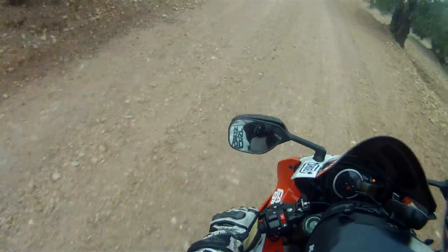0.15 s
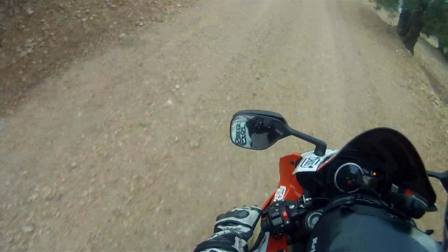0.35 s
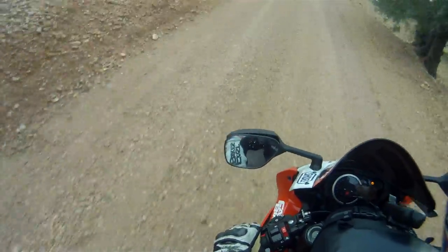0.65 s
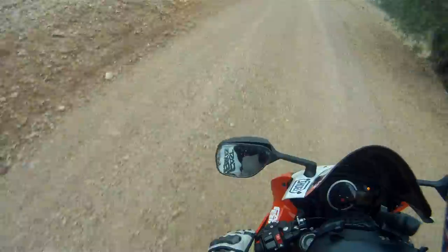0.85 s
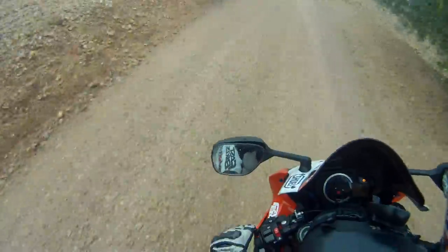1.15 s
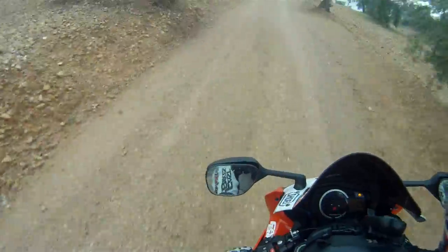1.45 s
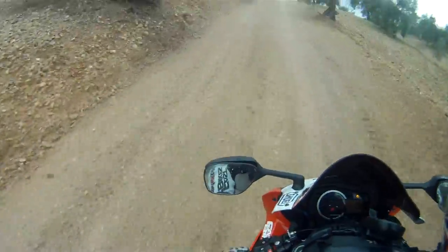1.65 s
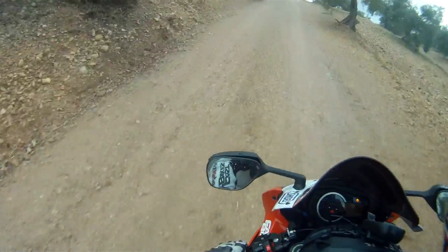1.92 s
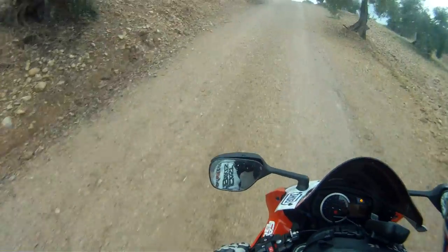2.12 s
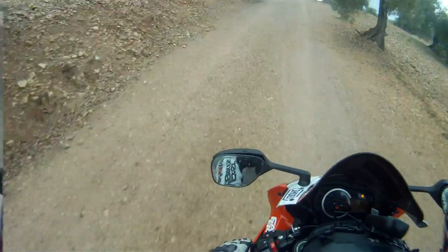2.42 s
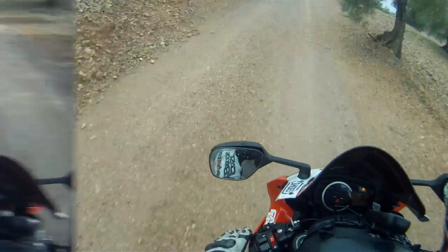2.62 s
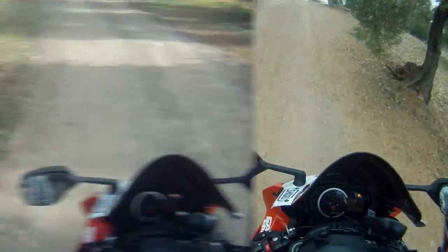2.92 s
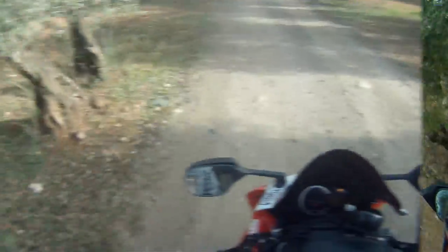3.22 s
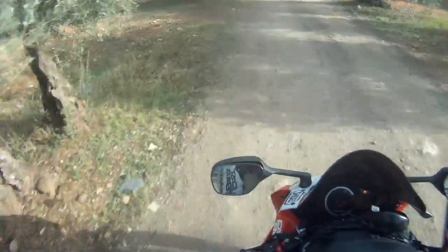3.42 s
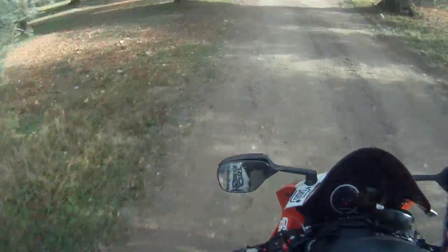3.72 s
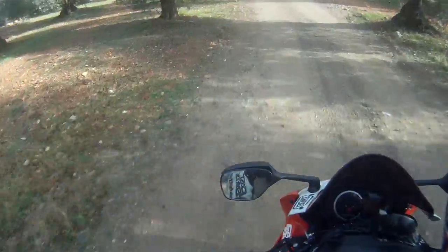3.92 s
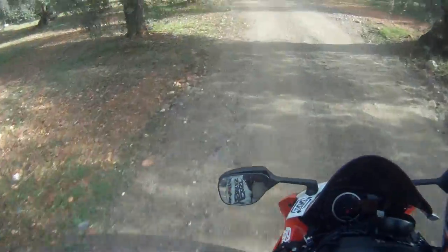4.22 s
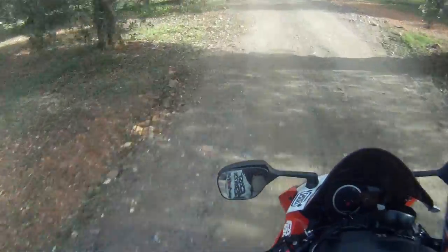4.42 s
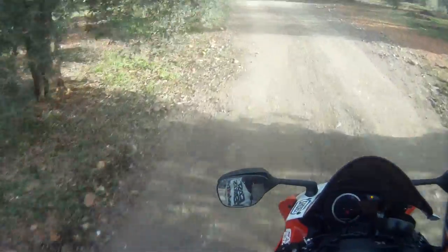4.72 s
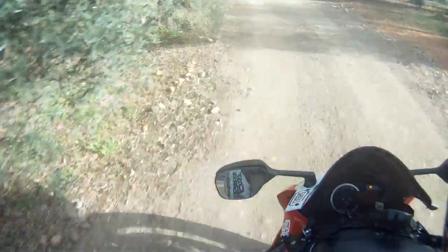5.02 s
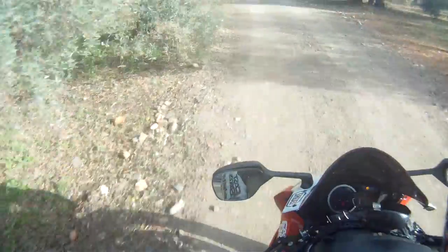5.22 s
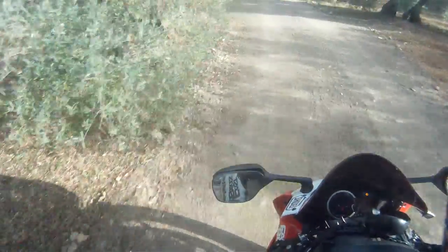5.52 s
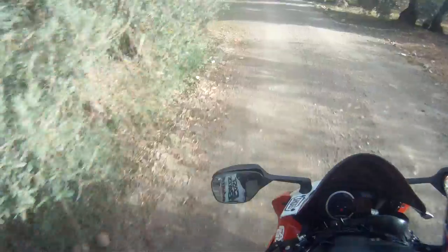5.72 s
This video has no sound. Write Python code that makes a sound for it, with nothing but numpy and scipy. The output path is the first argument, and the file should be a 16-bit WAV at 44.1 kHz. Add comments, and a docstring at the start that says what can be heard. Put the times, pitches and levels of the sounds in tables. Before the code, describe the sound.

Close on a rider's helmet, a motorcycle engine drones gently over rumbling tyres and gritty gravel, first whining, then slower and plainer.

```python
"""A low, steady engine hum with a gear whine over it: a four-cylinder motorcycle potters along a gravel track.
The microphone rides on the helmet; tyres rumble, gravel crunches and a few stones shift under the tyre.
One stretch, under light throttle, fades into a slower one without the whine. Sines make the low engine orders
and the gears, kicked resonances the exhaust, and shaped noise the gravel.
The small camera samples at a low rate and holds each sample, which mirrors the sound into the treble."""
import sys
import numpy as np
from scipy import signal
from scipy.fft import rfft, irfft
from scipy.io import wavfile

SR = 44100
rng = np.random.default_rng(int(sys.argv[2]) if len(sys.argv) > 2 else 0)


def transcribe(u):
    """Save the signal u as a 16-bit wav file named by the first command-line argument.

    u: samples, shape (n,) or (channels, n), limited to [-1, 1]; the rate is SR.
    q: integer samples, one column per channel.
    """
    v = np.clip(np.atleast_2d(u).T, -1, 1)
    q = np.round(v * 32767).astype(np.int16)
    wavfile.write(sys.argv[1], SR, q)


N = 258426
TIME = np.arange(N) / SR   # seconds

# Spectrum of stones and engine clatter on the first stretch. Each row: frequency in Hz, relative density in dB.
CRUNCH_SPECTRUM = [(470, -34), (800, -9.5), (947, -4.5), (1030, -8.5), (1240, -6), (1380, -10.5),
                   (1480, -5.5), (1720, -8.5), (2280, -4), (3500, -14), (3900, -17), (5030, -26),
                   (6000, -31.5), (7800, -79), (13200, -120)]
# Engine speed on the first stretch, under load. Each row: time in seconds, firings per second.
PULLING_FIRINGS = [(0, 60.2), (.45, 61.3), (.53, 60.7), (.78, 62.1), (1.08, 62.2), (1.38, 63.9),
                   (1.5, 63.6), (2.33, 66.0), (2.54, 65.2), (2.83, 65.6), (2.96, 63.9), (3.2, 63.2)]


def from_db(db):
    """dB to gain."""
    return 10 ** (np.asarray(db) / 20)


def rms_one(x):
    """Scale to rms 1."""
    return x / np.sqrt(np.mean(x ** 2) + 1e-20)


def in_time(rows):
    """Draw straight lines between the rows of a table: each column at every sample."""
    seconds, *columns = np.transpose(rows)
    return [np.interp(TIME, seconds, column) for column in columns]


def drift(pole_hz):
    """Slow chance: noise through a double one-pole low-pass, made at 1/40 of the sample rate; spread 1."""
    step = 40
    r = np.exp(-2 * np.pi * pole_hz * step / SR)
    noise = rng.standard_normal(N // step + 2002)
    slow = signal.lfilter([1], [1, -2 * r, r * r], noise)[2000:]   # skip the filter's start
    return np.interp(np.arange(N) / step, np.arange(len(slow)), rms_one(slow))


def resonance(x, hz, width_hz):
    """A two-pole resonance with gain 1 at its peak, as of a ringing panel or pipe."""
    r = np.exp(-np.pi * width_hz / SR)
    feedback = [1, -2 * r * np.cos(2 * np.pi * hz / SR), r * r]
    return signal.lfilter([(1 - r * r) / 2, 0, (r * r - 1) / 2], feedback, x)


def coloured(x, spectrum):
    """Filter x by the curve of the table, straight in dB over log frequency; rms 1."""
    hz, db = np.transpose(spectrum)
    bins_hz = np.maximum(np.fft.rfftfreq(N, 1 / SR), 1)
    curve_db = np.interp(np.log(bins_hz), np.log(hz), db, left=-90, right=-90)
    return rms_one(irfft(rfft(x) * from_db(curve_db), N))


def gravel(clatter, later):
    """Lumpy rumble, and a crunch of dense grains that throbs with the firings and rings the panels."""
    # Coarseness of the track. Each row: time in seconds, crunch level in dB.
    track = [(0.0, -38.5), (0.37, -39.5), (0.47, -37.5), (1.76, -39), (1.84, -37), (1.89, -40.5),
             (2.32, -37.5), (3.04, -43.5), (3.38, -41.5), (3.86, -43), (4.91, -39), (5.22, -41),
             (5.41, -38), (5.54, -41.5), (5.8, -41.5)]
    # Tyres and frame on the first stretch. Each row: frequency in Hz, relative density in dB.
    rumble_spectrum = [(15, -37), (25, -23), (53, -2), (130, -4), (150, -7), (173, -7), (315, -7.5),
                       (352, -11.5), (612, -16), (801, -29), (1100, -55), (1430, -76), (2420, -120)]
    # Tyres and frame on the slower stretch. Each row: frequency in Hz, relative density in dB.
    later_rumble_spectrum = [(15, -41), (25, -18), (44, -4.5), (114, -2), (136, -4.5), (162, 0), (209, -7),
                             (282, -6), (381, -10), (814, -26), (1100, -44.5), (1430, -75), (2420, -120)]
    # Stones and clatter on the slower stretch. Each row: frequency in Hz, relative density in dB.
    later_crunch_spectrum = [(470, -37.5), (800, -10), (939, -4), (1340, -3), (1520, -7), (1810, -2.5),
                             (2430, -3.5), (3470, -13.5), (3970, -16), (5070, -24.5), (6000, -29.5),
                             (7800, -70.5), (13200, -120)]
    # Panels that ring in the crunch. Each row: frequency in Hz, width in Hz, gain in dB over the plain grains.
    panels = [(2240, 39, -20.5), (3910, 150, -2.5), (4930, 89, -0.5)]
    mean_rumble_db, rumble_follows = -23.5, 0.24   # the second is its share of the crunch's swing

    crunch_db, = in_time(track)
    rumble_db = mean_rumble_db + rumble_follows * (crunch_db - crunch_db.mean())

    lumps = rng.standard_normal(N) * from_db(1.0 * drift(22))
    rumble = (1 - later) * coloured(lumps, rumble_spectrum) + later * coloured(lumps, later_rumble_spectrum)

    grains = rng.standard_normal(N) * from_db(0.58 * drift(11) + 1.0 * drift(140)) * clatter
    ringing = sum(from_db(db) * resonance(grains, hz, width_hz) for hz, width_hz, db in panels)
    grains = grains + ringing
    crunch = (1 - later) * coloured(grains, CRUNCH_SPECTRUM) + later * coloured(grains, later_crunch_spectrum)
    return from_db(rumble_db) * rumble + from_db(crunch_db) * crunch


def stones():
    """Bursts of crunch as a stone shifts under the tyre and jolts the frame: quick swell, short tail."""
    # Louder crunches. Each row: start in seconds, strength in dB ahead of the swell's smoothing.
    shifting_stones = [(0.137, -31), (0.7184, -30), (1.29, -30), (1.8376, -25.5), (2.3006, -34),
                       (2.364, -33), (4.829, -30), (4.885, -31.5), (5.0316, -31), (5.1144, -36)]
    rise_s, fall_s = 0.0035, 0.0045
    thud_db, thud_hz = 3.5, 450   # level beside the unfiltered crunch, and pitch of the frame

    burst = np.zeros(N)
    for start_s, db in shifting_stones:
        burst[round(start_s * SR)] = from_db(db)
    rise, fall = np.exp(-1 / (rise_s * SR)), np.exp(-1 / (fall_s * SR))
    tail = signal.lfilter([1], [1, -fall], burst)
    swell = signal.lfilter([1 - rise], [1, -rise], tail)

    crunch = coloured(rng.standard_normal(N), CRUNCH_SPECTRUM)
    dull = signal.sosfilt(signal.butter(2, 3200, fs=SR, output="sos"), crunch)
    thud = from_db(thud_db) * rms_one(resonance(rng.standard_normal(N), thud_hz, 180))
    return swell * (dull + thud)


def whine(hz, db, throb_db, waver):
    """Meshing teeth: a tone whose pitch wavers and whose level throbs."""
    throb_hz = 9.15   # the chain tightens and slackens
    throb = throb_db * np.cos(2 * np.pi * throb_hz * (TIME - .03))
    level = from_db(db + throb + 0.43 * drift(7.3))
    cycles = np.cumsum(hz * (1 + waver * drift(24.4))) / SR
    return np.sqrt(2) * level * np.sin(2 * np.pi * cycles)


def gears():
    """The whine follows engine speed; two steadier tones lie above it; all stop amid the fade."""
    # Whine, loud in spells. Each row: time in seconds, level in dB, throb depth in dB.
    whine_levels = [(0, -34, 4), (.45, -43, 8.5), (.92, -41, 11.5), (1.5, -45, 4.5), (2.0, -49, 5),
                    (2.2, -39, 3), (2.35, -46, 0), (2.47, -34, 0), (2.62, -41, 2), (2.8, -34, 4),
                    (3.0, -55, 3)]
    # Top tone of the gears. Each row: time in seconds, pitch in Hz, level in dB.
    top_tone = [(0, 1232, -50.5), (.5, 1210, -51), (1.1, 1240, -49.5), (1.9, 1285, -48), (2.4, 1293, -53),
                (2.8, 1292, -54), (3.05, 1255, -55)]
    whine_order, middle_share = 9.89, .75   # whine over firing rate; middle tone over top tone, in pitch
    middle_db, upper_throb_db = -5.5, 3   # middle tone relative to the top one; throb depth of both
    cut_s = 3.06   # the gears are silent from here

    firing_hz, = in_time(PULLING_FIRINGS)
    whine_db, whine_throb_db = in_time(whine_levels)
    top_hz, top_db = in_time(top_tone)
    low = whine(whine_order * firing_hz, whine_db, whine_throb_db, waver=.008)
    top = whine(top_hz, top_db, upper_throb_db, waver=0.0087)
    middle = whine(middle_share * top_hz, top_db + middle_db, upper_throb_db, waver=0.008)
    return (low + top + middle) * np.interp(TIME, [cut_s - .02, cut_s], [1, 0])


def engine(speed, levels, lags):
    """The two lowest orders are near sines; each firing also kicks the exhaust pipe with its own strength."""
    # Exhaust modes. Each row: frequency in Hz, width in Hz, relative level in dB.
    pipe_modes = [(194, 27, -12), (275, 34, 27.5), (380, 110, -29), (584, 99, -4)]
    in_step_s = 3.003   # amid the fade both engines fire together, and beat before and after
    silencer_hz = 550

    firing_hz, = in_time(speed)
    boom_db, second_db, pipe_db, loss_db, gain_db = levels
    boom_lag, second_lag = lags
    faster_hz = firing_hz - np.mean(speed, axis=0)[1]
    second_db = second_db - loss_db * faster_hz
    pipe_db = pipe_db + gain_db * faster_hz

    cycles = np.cumsum(firing_hz * (1 + .002 * drift(12))) / SR
    cycles = cycles - cycles[round(in_step_s * SR)]
    boom = from_db(boom_db + 0.25 * drift(25)) * np.cos(2 * np.pi * (cycles - boom_lag))
    second = from_db(second_db + 0.27 * drift(39)) * np.cos(4 * np.pi * (cycles - second_lag))

    fired = np.flatnonzero(np.diff(np.floor(cycles)))
    chance = rng.standard_normal((len(fired), len(pipe_modes)))
    pipe = 0
    for (hz, width_hz, db), uneven in zip(pipe_modes, chance.T):
        kicks = np.zeros(N)
        kicks[fired] = 1 + .14 * uneven
        pipe = pipe + from_db(db) * resonance(kicks, hz, width_hz)
    # the silencer rounds off the edge of every kick
    pipe = signal.sosfilt(signal.butter(4, silencer_hz, fs=SR, output="sos"), pipe)

    # valve gear and casing rattle after each firing: a gain for the gravel's grains
    clatter = from_db(1.8 * np.cos(2 * np.pi * (cycles - .21)))
    return np.sqrt(2) * (boom + second) + from_db(pipe_db) * rms_one(pipe), clatter


def scene():
    """The first stretch fades out as the second fades in."""
    # Engine speed on the slower stretch. Each row: time in seconds, firings per second.
    cruising_firings = [(3.15, 57.8), (3.77, 57.0), (4.41, 55.9), (4.84, 55.6), (5.32, 56.8), (5.37, 56.2),
                        (5.86, 57.8)]
    # boom, second order and exhaust pipe in dB at mean speed;
    # then per Hz of extra firing rate: the second order's loss in dB, the pipe's gain in dB
    pulling_levels = (-18.7, -18.5, -22, 0.44, .3)
    cruising_levels = (-19.5, -18.5, -22.5, -0.1, 0.2)
    # lag of boom and second order in firing cycles: under load both peak later after the firing
    pulling_lags, cruising_lags = (.07, .225), (.03, .14)

    later = np.interp(TIME, (2.67, 3.33), [0, 1])   # one stretch gives way to the next
    pulling = np.array(engine(PULLING_FIRINGS, pulling_levels, pulling_lags))
    cruising = np.array(engine(cruising_firings, cruising_levels, cruising_lags))
    motor, clatter = (1 - later) * pulling + later * cruising
    return (gravel(clatter, later) + stones() + gears() + motor)[None]


def record(dry):
    """Sampled at 12 kHz, each sample held four steps, then brought to the output rate; the top is cut."""
    cutoff_hz = 15300
    low = signal.resample_poly(dry, 40, 147, axis=1, window=("kaiser", 9))
    held = np.repeat(low, 4, axis=1)   # the steps mirror the sound above 6 kHz
    held = signal.resample_poly(held, 147, 160, axis=1)
    held = np.pad(held, ((0, 0), (0, 8)))[:, :N]
    return signal.sosfilt(signal.ellip(12, .5, 70, cutoff_hz, fs=SR, output="sos"), held)


dry = scene()
out = record(dry)
transcribe(out)
```